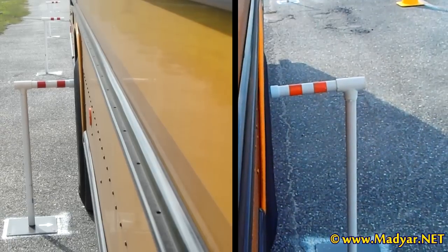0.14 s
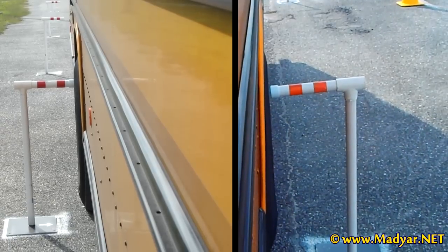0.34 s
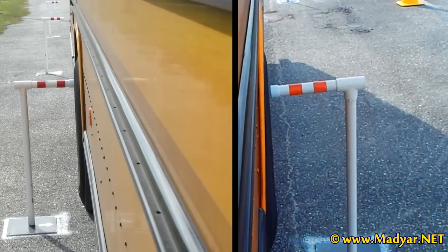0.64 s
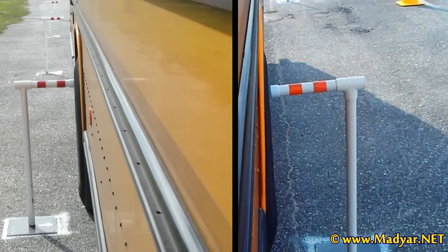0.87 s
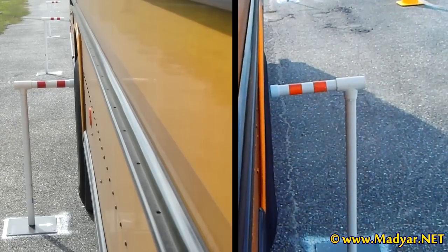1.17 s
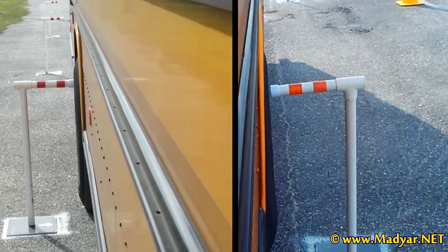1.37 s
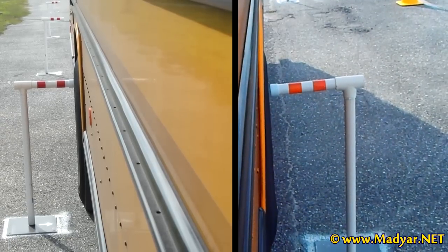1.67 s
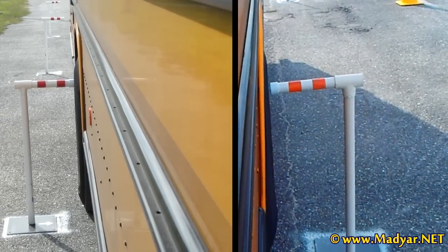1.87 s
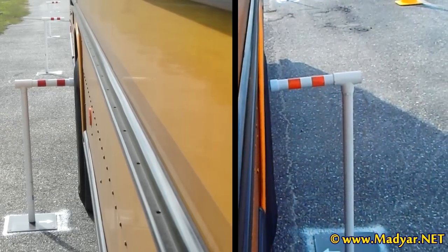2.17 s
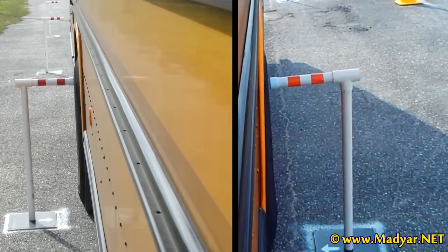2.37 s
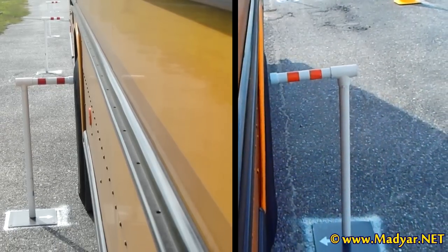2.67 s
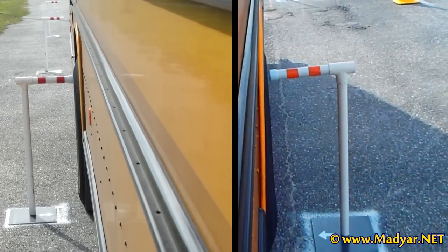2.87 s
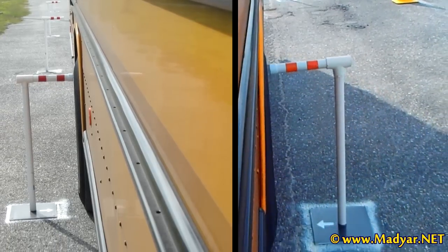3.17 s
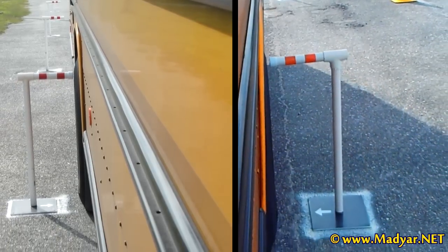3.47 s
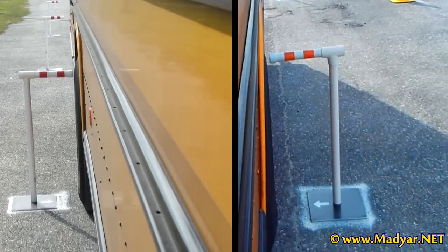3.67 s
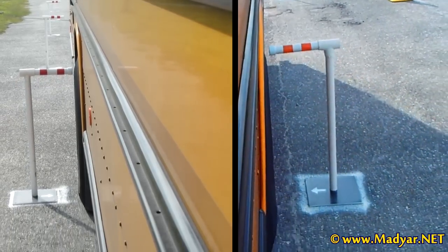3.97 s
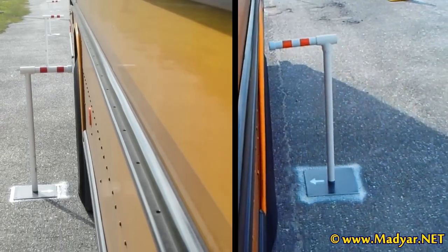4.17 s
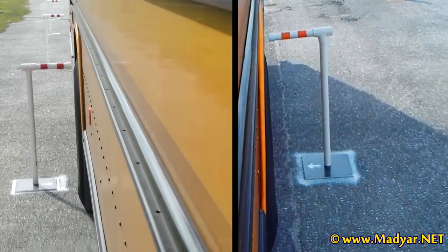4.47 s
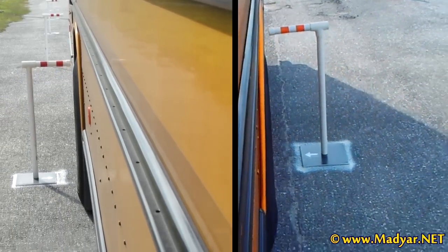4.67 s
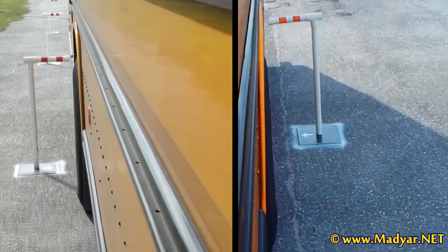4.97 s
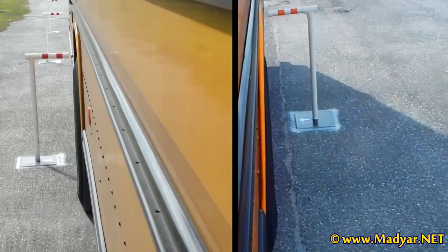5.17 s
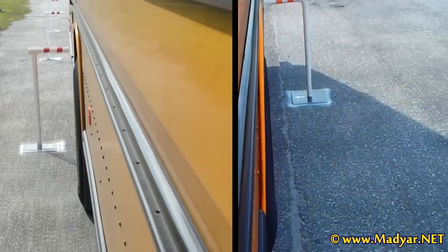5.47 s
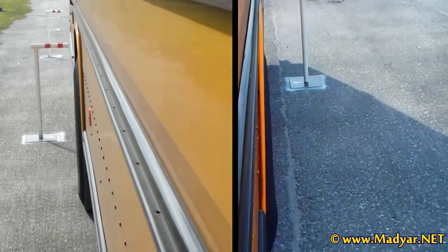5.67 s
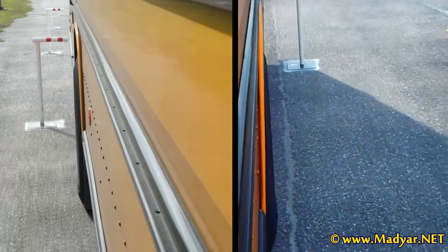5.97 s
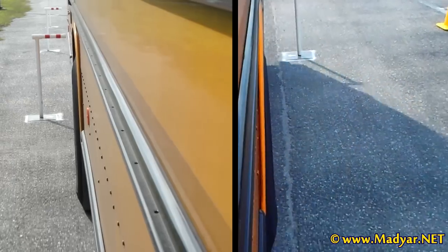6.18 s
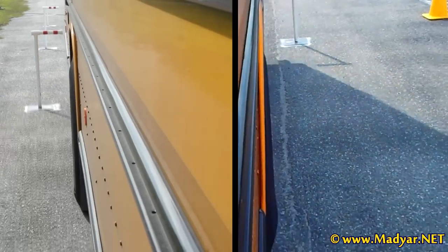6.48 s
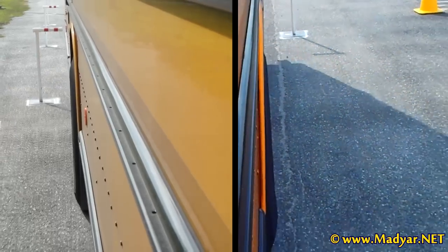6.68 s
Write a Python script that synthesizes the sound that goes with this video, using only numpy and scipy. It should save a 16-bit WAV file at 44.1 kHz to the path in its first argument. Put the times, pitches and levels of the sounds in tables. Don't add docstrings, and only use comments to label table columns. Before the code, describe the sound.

Outdoors on asphalt, close to a bus's flank, a six-cylinder diesel idles: low lumpy firing thumps, a hollow roar in the body panels, crisp valve clatter, a ticking injector and a pump hum, plus a very faint high whistle. At about 0.3 s a loud two-tone horn, roughly a minor third, buzzes for a fifth of a second, then toots shortly at 0.8, 1.05 and 1.4 s, with rasping brackets and brief close reflections. Each toot pushes the engine down in level; it creeps back over the next second or two. Soft air spits come at 1.2 and 1.3 s. Plain idling follows until a small brake puff at 4.1 s. From 4.5 s the revs climb quickly, peaking at 5 s with a thin turbo hiss that swells around 5.3 s. The revs fall by 5.85 s as the clutch bites, and the engine surges again near 6.25 s, growling steadily to the end at 6.8 s.

```python
import sys
import numpy as np
from scipy import signal
from scipy.fft import rfft, irfft
from scipy.io import wavfile
from scipy.ndimage import uniform_filter1d

SR = 44100
rng = np.random.default_rng(int(sys.argv[2]) if len(sys.argv) > 2 else 0)


def waveform_to_disk(signal):
    frames = np.transpose(np.atleast_2d(signal))
    scaled = np.clip(frames, -1, 1) * 32767
    samples = np.round(scaled).astype(np.int16)
    wavfile.write(sys.argv[1], SR, samples)


def how_loud(loudness_db):
    steps = np.asarray(loudness_db, float) / 20
    return 10 ** steps


N = 301203

# (frequency [Hz], correlation [-1 to 1])
PORT_LIKENESS = [(30, .8), (60, .92), (125, .98), (250, .992), (500, .99), (900, .98), (1500, .92),
                 (2600, .55), (4000, .1), (16000, -.2)]
# (frequency [Hz], level [dB])
PORT_LEAN = [(60, -.4), (740, -.5), (1700, -.6), (3000, -3), (4500, 0), (12000, 1.2)]
LEFT_LAG_S = 4.5e-5
# (depth [dB], attack [s], recovery [s])
DUCK_STAGES = [(11, 0.02, 1.0), (4.5, 0.13, 0.068)]

# (time [s], speed [turns/s])
CRANK_SPEED = [
    (0, 13.33),
    (4.47, 13.33),
    (4.75, 19.2),
    (5.0, 21.4),
    (5.5, 20.4),
    (5.85, 16.3),
    (6.83, 16.3),
]
# (time [s], level [dB])
EFFORT = [(0, -2), (.15, -2.5), (.3, -1.5), (2.1, 0), (2.4, -1), (3.0, -1), (3.15, 0.5), (4.35, -2),
          (4.6, 3), (5.0, 6), (5.4, 4.5), (5.65, 0), (6.05, -2), (6.25, 3), (6.45, 2), (6.7, 1.5),
          (6.83, 0)]
# (frequency [Hz], level [dB per Hz])
ROAR_COLOUR = [(15, -53.5), (28, -24), (45, -13), (62, -11), (87, -1.5), (125, -4), (180, -5), (219, -4),
               (363, -5), (501, -9), (953, -13.5), (1400, -20.5), (2000, -30.5), (2400, -34.5),
               (3980, -67.5)]
# (frequency [Hz], width [Hz], level [dB])
PANELS = [(108, 52, -11.5), (241.6, 68, -14.5), (371, 81, -16.5), (805, 46, -14.5), (960, 41, -26.5)]
# (frequency [Hz], level [dB per Hz])
CLATTER_COLOUR = [(1500, -29), (2300, -1.5), (3200, 3.5), (4000, 0.5), (5000, -1.5), (5700, -10),
                  (6500, -12.5), (7300, -25.5), (7800, -47.5), (8500, -34), (9500, -17.5), (11000, -16),
                  (14000, -18), (15700, -22.5)]
CYLINDERS = [5.5, 8, -4.5, -15.5, 1, -4.5]
# (frequency [Hz], level over the engine [dB])
PUMP_MOUNT = [(150, -5), (183, -18.5), (222, -3.5), (240, -20), (300, -26), (366, -8), (420, -26.5),
              (480, -20)]
# (frequency [Hz], level over the engine [dB])
TAILPIPE = [(40, -12.5), (49, -20.5), (60, -27)]

# (start [s], hold [s], level [dB], attack [s])
BRAKE_PUFFS = [
    (1.205, .08, -43.5, .015),
    (1.275, .07, -37.5, .02),
    (4.088, .05, -37.5, .02),
]
# (frequency [Hz], level [dB per Hz])
AIR_COLOUR = [(1500, -10), (2300, 6), (3200, 2), (5000, 2), (6500, -3), (7300, -13), (7800, -15),
              (8500, -12), (9500, -4), (12500, 0.5), (14500, 0.5), (15700, -3)]
# (time [s], level [dB])
TURBO = [
    (4.5, -80),
    (4.68, -55),
    (5.1, -56),
    (5.25, -52),
    (5.65, -55),
    (5.73, -76),
]

# (start [s], length [s], level [dB])
TOOTS = [
    (0.285, .201, 0),
    (.819, .069, -1),
    (1.03, .015, -11),
    (1.045, 0.045, -2),
    (1.4, 0.089, -1),
]
# (first swing [dB], its peak [s], held tone [dB], echo on release [dB],
# held tone adds to [+1] or cancels [-1] the swing)
LOW_PARTIALS = [(-17.5, .02, -19.5, -33.5, 1), (-18.5, .02, -19, -29, 1), (-23, .038, -39, -23, 1),
                (-28.5, 0.016, -23, -27, -1)]
HIGH_PARTIALS = [(-19, .02, -28.5, -26, -1), (-17.5, .011, -14, -26, -1), (-27, .02, -22, -40.5, 1),
                 (-40, .014, -24.5, -43.5, 1)]
# (multiple of the pitch, level over partial 4 [dB])
LOW_UPPER = [(5, -5.5), (6, -18), (7, -32.5), (8, -41.5), (10, -41.5), (13, -47), (17, -55.5), (21, -43),
             (36, -49)]
HIGH_UPPER = [(5, -18.5), (6, -31), (7, -33), (8, -35), (9, -33), (10, -34.5), (11, -37.5), (13, -41),
              (14, -47), (15, -58), (17, -43), (20, -37), (24, -39), (30, -47.5)]
# (pitch [Hz], flat start [Hz], climb [s], sag on release [Hz], held tone builds [s],
# echo peak [s], quits early [s])
LOW_REED = (431.5, 26, .024, 6.7, 0.056, 0.015, .017)
HIGH_REED = (520.5, 27, 0.016, 0.25, 0.031, 0.029, 0.0016)
# (frequency [Hz], level [dB per Hz])
RASP_COLOUR = [(300, -30.5), (700, -6), (1500, -7.5), (2500, -25), (5000, -38), (7800, -61.5), (10500, -43),
               (15700, -51)]


def evened(x):
    return x / np.sqrt(np.mean(x ** 2) + 1e-20)


def read(points, hz):
    f, value = np.transpose(points)
    return np.interp(np.log(hz + 1), np.log(f + 1), value)


def curve(rows, outside=None):
    s, value = np.transpose(rows)
    return np.interp(np.arange(N) / SR, s, value, outside, outside)


def filtered(x, response):
    return irfft(rfft(x) * response(np.fft.rfftfreq(N, 1 / SR)), N)


def ports(hz):
    half = how_loud(read(PORT_LEAN, hz) / 2)
    return np.array([half * np.exp(-2j * np.pi * hz * LEFT_LAG_S), 1 / half])


def noise(colour, patchy_db, drive=0):
    frames, hz = N // 256 + 5, np.fft.rfftfreq(1024, 1 / SR)
    a, b, c, d, patches = rng.standard_normal((frames, 513, 5)).T
    patches = uniform_filter1d(patches, size=8, axis=0)
    patches = evened(uniform_filter1d(patches, size=10, axis=1))
    same = np.clip(read(PORT_LIKENESS, hz), -1, 1)[:, None]
    left = a + 1j * b
    right = same * left + np.sqrt(1 - same ** 2) * (c + 1j * d)
    spectra = np.array([left, right]) * how_loud(patchy_db * patches)
    white = evened(signal.istft(spectra, nperseg=1024, noverlap=768)[1][:, :N])
    return evened(filtered(white + drive, lambda hz: colour(hz) * ports(hz)))


def scan_whine():
    return how_loud(-54) * np.sin(2 * np.pi * 15734.3 * np.arange(N) / SR)


def shaft_hum(speed, turns):
    pump_order = 11.23
    hum = how_loud(read(TAILPIPE, 3 * speed) - 3) * np.sqrt(2) * np.cos(6 * np.pi * turns)
    for k in (1, 2):
        level = how_loud(read(PUMP_MOUNT, k * pump_order * speed))
        hum += level * np.sqrt(2) * np.cos(2 * np.pi * k * pump_order * turns)
    return hum


def injector_tick(speed, turns):
    size_db, phase = rng.standard_normal((200, 2))[np.floor(turns).astype(int)].T
    tick = np.exp(-((turns % 1 - .14) / .06) ** 2) * how_loud(1.5 * size_db)
    ring = np.sin(2 * np.pi * 1950 * np.arange(N) / SR + 3 * phase)
    return tick * ring * how_loud(-15 + read(TAILPIPE, 3 * speed) + 14.5)


def panel_response(hz):
    response = how_loud(read(ROAR_COLOUR, hz))
    for f, width, db in PANELS:
        response = response + how_loud(db) / (1 + ((hz - f) / width * 2) ** 2) ** 2
    return response


def body_roar(speed, effort_db, fired, strength, knock):
    thumps = 0.5 * evened(np.diff(fired, prepend=fired[0]) * strength)
    thumps = filtered(thumps, lambda hz: 1 / (1 + (hz / 160) ** 4))
    roar = noise(panel_response, patchy_db=0.57, drive=thumps)
    bass = filtered(roar, lambda hz: 1 / (1 + (hz / 122) ** 8))
    low = filtered(roar, lambda hz: 1 / (1 + (hz / 420) ** 4))
    bass_db = -2 - 0.1 * (speed - 12) ** 2
    bright_db = 0.94 - 0.5 * effort_db
    return bass * how_loud(bass_db) + low - bass + (roar - low) * how_loud(bright_db) * (1 + 0.18 * knock)


def engine():
    effort_db, speed = curve(EFFORT), curve(CRANK_SPEED)
    turns = np.cumsum(speed) / SR - .2
    fired = np.floor(3 * turns).astype(int)
    strength = how_loud(np.array(CYLINDERS)[fired % len(CYLINDERS)] + 2.7 * rng.standard_normal(600)[fired])
    since = 3 * turns % 1
    knock = uniform_filter1d(strength * np.exp(-since / 0.21), size=150)
    roar = body_roar(speed, effort_db, fired, strength, knock)

    valves = uniform_filter1d(np.exp(-(turns % 1) / .55), size=500)
    gate = .5 + .55 * valves + .15 * knock
    rattle = filtered(roar * signal.windows.tukey(N, 1 / 200), lambda hz: 1 / (1 + (1800 / (hz + 1)) ** 6))
    roar += rattle * (gate / gate.mean() - 1)
    clatter_db = -26.5 - 0.96 - .9 * effort_db
    clatter = how_loud(clatter_db) * noise(lambda hz: how_loud(read(CLATTER_COLOUR, hz)), patchy_db=0.8) * gate

    tones = injector_tick(speed, turns) + shaft_hum(speed, turns) + scan_whine()
    return how_loud(-18 + effort_db) * (how_loud(2.5) * roar + clatter + tones)


def turbo_hiss():
    def colour(hz):
        return 1 / (1 + ((hz - 11500) / 1500) ** 2) + 2.2 / (1 + ((hz - 5300) / 1100) ** 4)
    return how_loud(curve(TURBO, outside=-120)) * noise(colour, patchy_db=1.2)


def brake_air():
    start, hold, level_db, attack = np.transpose(BRAKE_PUFFS)[:, :, None]
    t = np.arange(N) / SR - start
    fade_db = 190 * np.maximum(t - attack - hold, 0)
    puffs = np.clip(t / attack, 0, 1) ** 2 * how_loud(level_db - fade_db)
    return puffs.sum(0) * noise(lambda hz: how_loud(read(AIR_COLOUR, hz)), patchy_db=-1.5)


def bracket_rasp(toots):
    shaking = np.sqrt(abs(uniform_filter1d(toots ** 2, size=1300)))
    return how_loud(-18.5) * shaking * noise(lambda hz: how_loud(read(RASP_COLOUR, hz)), patchy_db=3.5)


def yard(x):
    taps = np.zeros((2, 6000))
    at = np.arange(200, 5980, 20) + rng.integers(0, 20, (2, 289))
    bounces = rng.choice([-1., 1.], at.shape) * how_loud(-60 * at / SR / .18)
    np.put_along_axis(taps, at, bounces, 1)
    return signal.fftconvolve(x[None], taps / np.linalg.norm(taps[0]), axes=1)[:, :N]


def swing(t, peak_s):
    u = np.maximum(t, 0) / peak_s
    return (u * np.exp(1 - u)) ** 2


def horn(partials, reed, upper):
    top_hz, flat_hz, climb_s, sag_hz, build_s, echo_s, early_s = reed
    let_go_s, bell_s = .007, 0.023
    t = np.arange(2 * SR) / SR
    start, length, level_db = np.transpose(TOOTS)[:, :, None]
    on = np.maximum(t - start, 0)
    off = np.maximum(t - start - length + early_s, 0)

    latest = np.maximum((on > 0).sum(0) - 1, 0), np.arange(len(t))
    hz = top_hz - flat_hz * np.exp(-on / climb_s) - sag_hz * (1 - np.exp(-off / let_go_s / 2))
    turns = np.cumsum(hz[latest]) / SR

    built = 1 - np.exp(-(on / build_s) ** 2)
    pressed = np.exp(-(off / let_go_s) ** 2 / 2)
    echo = swing(off, echo_s) * (1 - np.exp(-(length / build_s) ** 2))
    sizes = []
    for first_db, peak_s, held_db, echo_db, adds in partials:
        sounding = how_loud(first_db) * swing(on, peak_s) + np.sign(adds) * how_loud(held_db) * built
        sizes.append((how_loud(level_db) * (pressed * sounding + how_loud(echo_db) * echo)).sum(0))

    bell = (how_loud(level_db + partials[-1][2]) * built * np.exp(-(off / bell_s) ** 2 / 2)).sum(0)
    for k in range(5, int(upper[-1][0]) + 1):
        beat = np.sin(2 * np.pi * (rng.uniform(5, 12) * t + rng.random()))
        sizes.append(bell * how_loud(read(upper, k) + 5 * beat))
    tone = sum(size * np.cos(2 * np.pi * (k + 1) * turns - 0.12 * k ** 2) for k, size in enumerate(sizes))
    return np.sqrt(2) * how_loud(12.5) * np.pad(tone, (0, N - len(t)))


def scene():
    toots = horn(LOW_PARTIALS, LOW_REED, LOW_UPPER) + horn(HIGH_PARTIALS, HIGH_REED, HIGH_UPPER)
    bus = engine() + turbo_hiss() + brake_air()
    return bus + bracket_rasp(toots) + how_loud(-21) * yard(toots) + filtered(toots, ports)


def ducking_db():
    start, length, _ = np.transpose(TOOTS)[:, :, None]
    t = np.arange(N) / SR - start
    held, after = np.clip(t, 0, length), np.maximum(t - length, 0)
    return -sum((depth_db * (1 - np.exp(-held / attack)) * np.exp(-after / recovery)).max(0)
                for depth_db, attack, recovery in DUCK_STAGES)


def roll_off(x):
    return signal.sosfilt(signal.butter(12, 15830, fs=SR, output="sos"), x)


def record(dry):
    mix = np.clip(dry * how_loud(ducking_db()), -1, 1)
    return roll_off(mix)


dry = scene()
out = record(dry)
waveform_to_disk(out)
```